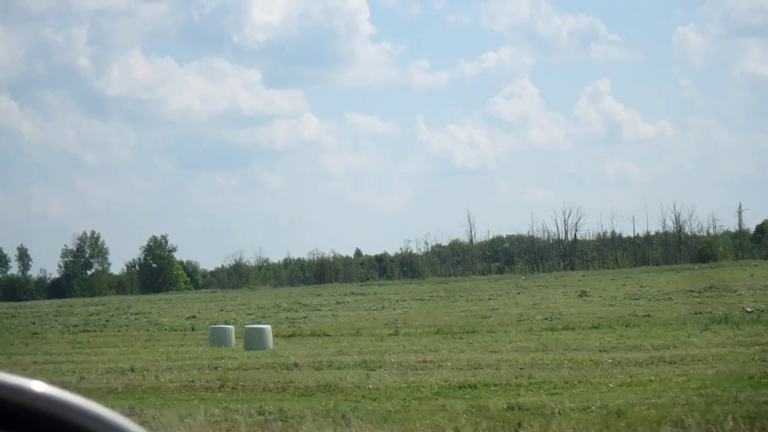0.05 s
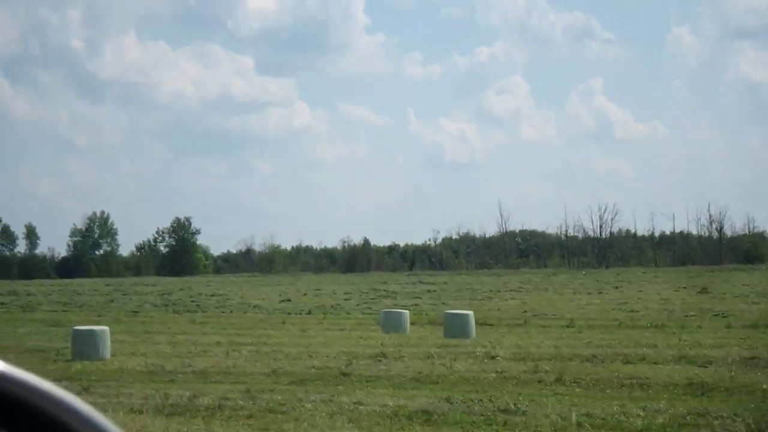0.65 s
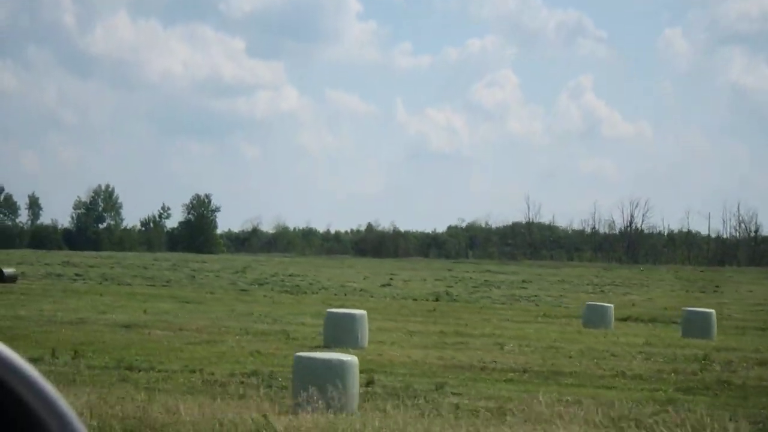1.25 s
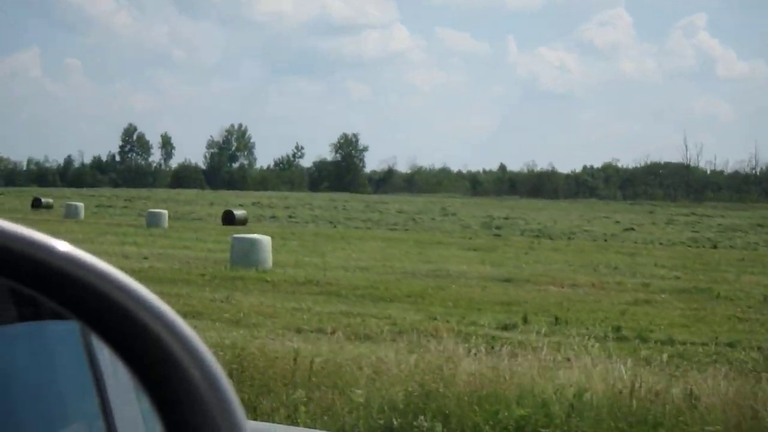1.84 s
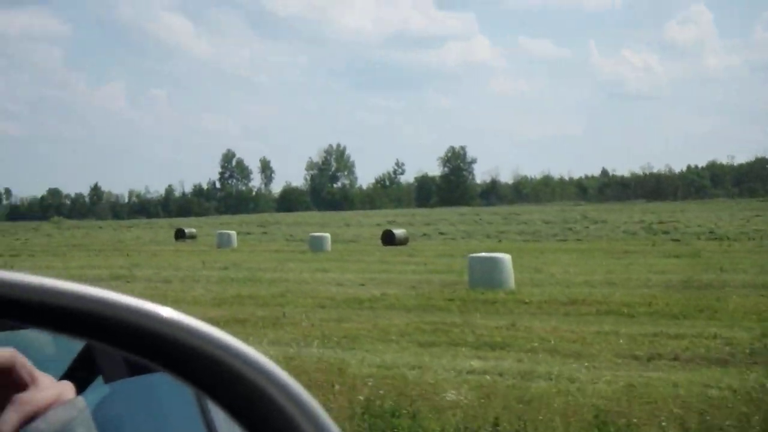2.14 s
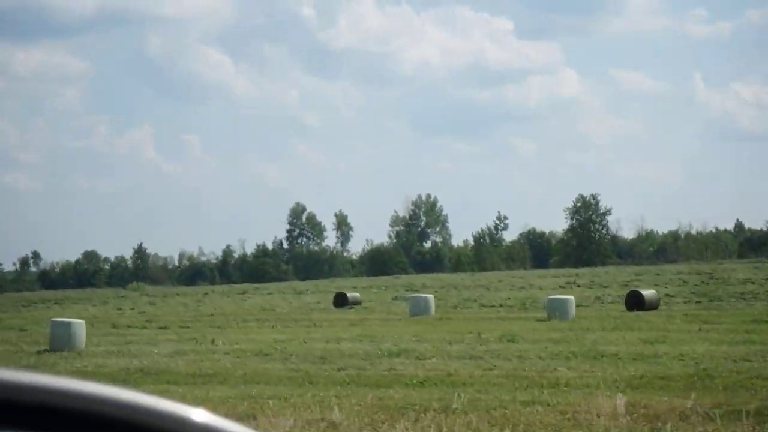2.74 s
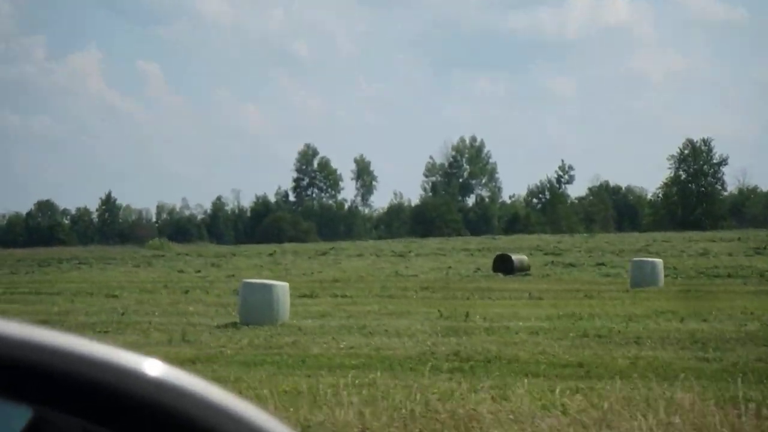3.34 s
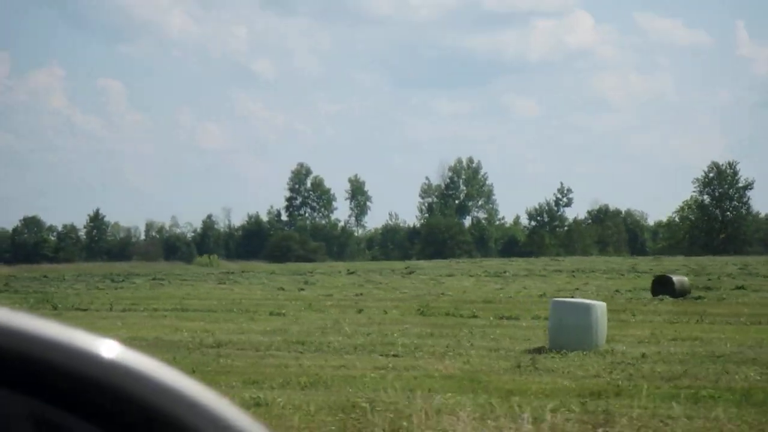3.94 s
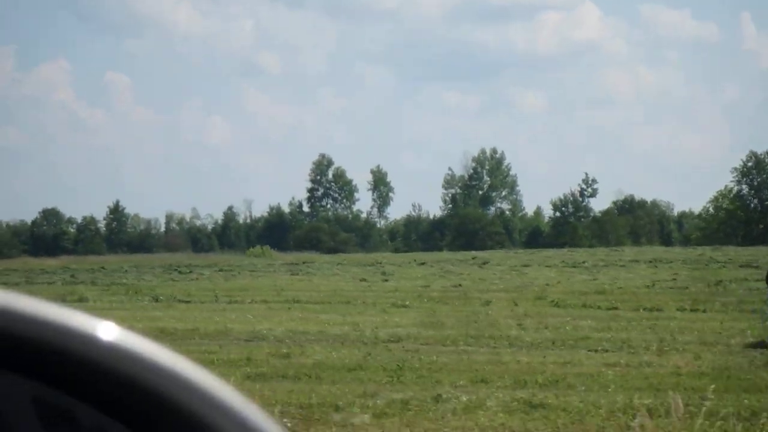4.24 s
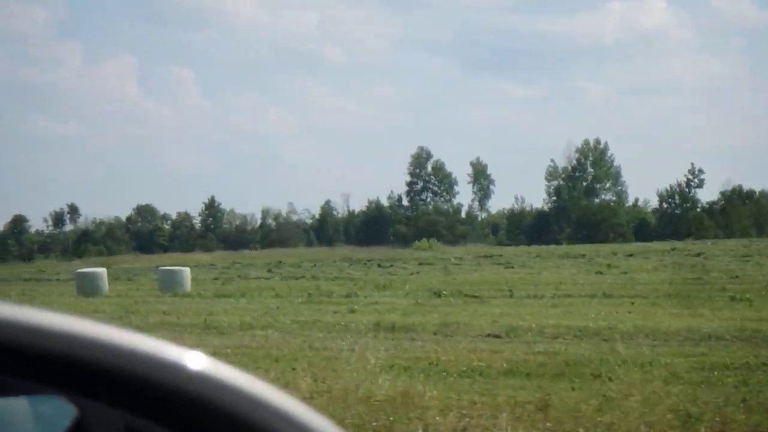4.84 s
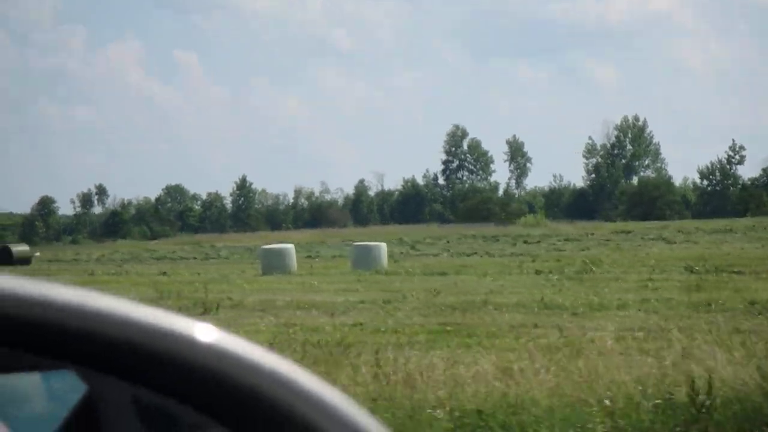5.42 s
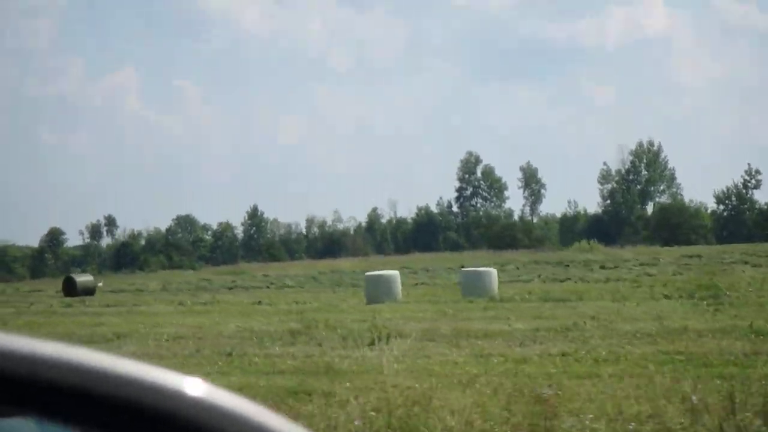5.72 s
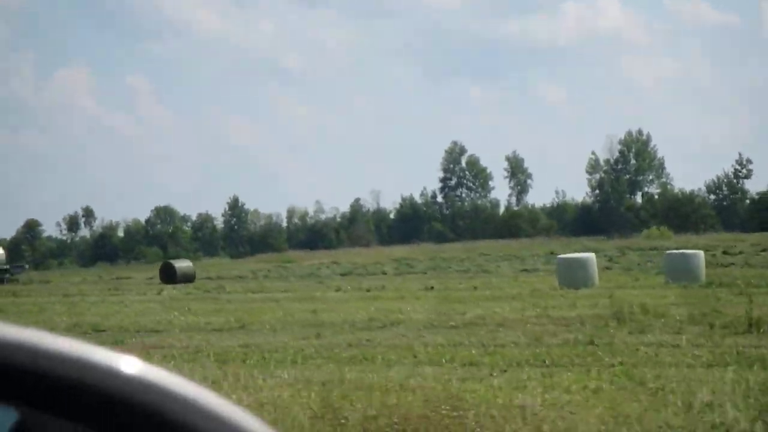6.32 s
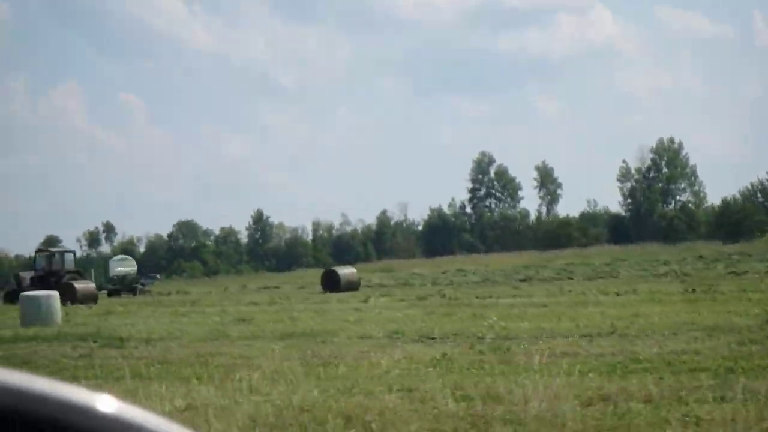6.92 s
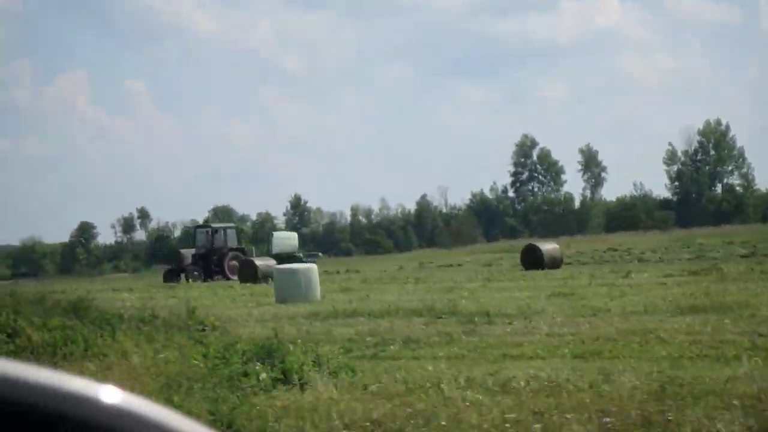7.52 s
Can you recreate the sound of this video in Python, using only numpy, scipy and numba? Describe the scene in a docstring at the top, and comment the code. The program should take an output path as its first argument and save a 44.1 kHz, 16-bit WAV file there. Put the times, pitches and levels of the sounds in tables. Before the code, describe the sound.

Dull thumps, a short scrape and a cluster of sharp plastic clicks sound right at a handheld microphone inside a moving car. The road noise ducks suddenly and takes some three seconds to recover. From then on, low rumble and slightly singing tyre roar fill the cabin, rising and falling gently with the asphalt. Beneath them are a faint engine hum, window hiss, tiny ticks and occasional soft draughts.

```python
"""Tyres roar and sing on a country road, heard inside the car: the cabin booms, the engine hums
faintly, wind hisses at the window seals. At the start a hand bumps, scrapes and clicks on the
pocket camera; its gain control ducks by about 30 dB and recovers over some three seconds.
Later, puffs of draught on the microphones and small ticks from the grip and the cabin trim."""
import sys
import numpy as np
from scipy import signal
from scipy.fft import irfft
from scipy.io import wavfile
from scipy.ndimage import uniform_filter1d
from numba import njit

SR = 44100
rng = np.random.default_rng(int(sys.argv[2]) if len(sys.argv) > 2 else 0)


def dump_mix(stems):
    """Bounce the given channels to the path in sys.argv[1] as a 16-bit WAV at rate SR."""
    frames = np.atleast_2d(stems).T  # one column per channel
    limited = np.clip(frames, -1, 1)  # hard clip at full scale
    pcm = np.round(limited * 32767).astype(np.int16)
    wavfile.write(sys.argv[1], SR, pcm)


N = 333837
TIME_S = np.arange(N) / SR
FREQS_HZ = np.maximum(np.fft.rfftfreq(N, 1 / SR), 1)

# noise spectra: freq_hz, relative_density_db
CABIN_AIR_SPECTRUM = [(14, -18), (21, -2), (31, -2), (42, 0.5), (52, -1.5), (62, -8), (72, -11.5),
                      (95, -17), (160, -42)]
BODY_PANEL_SPECTRUM = [(55, -26), (85, 6), (112, 2.5), (140, 1.3), (172, 3), (215, -3), (290, -0.85),
                       (370, -1.04), (460, -3), (570, 0.7), (690, -3.5), (850, -9), (1100, -33.5),
                       (2000, -54)]
TREAD_SPECTRUM = [(500, -8), (850, -4.5), (985, 2.15), (1070, -2.5), (1280, -3.5), (1380, -7), (1550, -6.5),
                  (1850, -10), (2300, -14.5), (2650, -16.5), (2950, -21.5), (3250, -14), (3700, -27.5),
                  (5000, -36)]
WINDOW_SEAL_SPECTRUM = [(2500, -53), (3900, 9.5), (4400, -11), (5000, 1.5), (5600, 6), (6400, -4.5),
                        (7200, 1), (7750, -3.5), (8300, -0.5), (8900, -4.5), (10500, -7.5), (11800, -20),
                        (14800, -21), (15800, -29)]
PALM_SPECTRUM = [(70, 14.5), (140, 5), (230, -1), (500, -8), (1500, -13.5), (3300, -17), (5000, -35)]
CASE_SPECTRUM = [(100, 10), (700, -10.5), (1800, 2), (2600, -13), (3400, 3), (3850, 5.5), (4600, -3),
                 (5600, 5), (7000, -4.5), (8200, 2.5), (10500, -5.5), (12500, -19), (15500, -17)]
CASE_SNAP_SPECTRUM = [(7000, -14), (10000, -2), (13000, 0), (15000, -8), (16000, -11)]
DRAUGHT_SPECTRUM = [(45, -2), (110, 2), (190, -6), (300, -13), (550, -28)]
TRIM_SPECTRUM = [(1000, -27), (4000, -11), (8000, -7.5), (11000, -15), (12500, -25), (15500, -30)]
# road bumps, coarser (+) or smoother (-) asphalt: centre_s, length_s, rise_db
ROAD_BUMPS = [(.5, 0.13, 7.5), (1.1, 0.63, 4), (1.48, 0.16, 5), (1.77, 0.17, 5.5), (2.3, .3, 1.5),
              (2.85, 0.23, 6), (3.98, 0.18, 5.5), (5.4, .25, 2), (5.93, 0.12, 6), (6.35, 0.42, 3),
              (6.85, 0.33, 2), (7.38, 0.47, 6.5)]
ASPHALT_STRETCHES = [(.08, 0.12, 3), (2.02, 0.4, 1.5), (2.75, 0.34, 1.4), (3.68, .36, 2), (4.44, 0.19, 1.6),
                     (4.8, .16, -0.5), (5.2, 0.35, 1.5), (5.78, 0.35, 2), (6.9, 0.68, 1.3)]
# engine harmonics: firing_multiple, level_db
ENGINE_ORDERS = [(1, -31.5), (2, -36), (3, -39.5)]
# finger strokes on the case: start_s, length_s, level_db
FINGER_STROKES = [(0.198, 0.065, -15.5), (.27, .08, -34), (0.349, 0.034, -16)]
# short bursts: start_s, level_db, decay_ms
PALM_THUMPS = [(.062, -10, 32), (.088, -14, 18), (.207, -9.5, 12), (.222, -6.5, 22), (.347, 6, 7.3)]
CASE_CLICKS = [(.2099, -12, 0.83), (.2392, 4.5, 2.5), (.2456, 0.5, 1.5), (.2566, -13, 2.5),
               (.2856, -8, 1.2), (.3116, -15, 3.1), (.3183, 0, 0.83), (.3468, 7, 4.6), (.3497, 10.5, 2.2),
               (.352, 9.5, 1.6), (.3556, 5, 2.7), (.3736, -6, 2), (.4948, -2.5, 1.2), (.5392, -6, 1.6),
               (6.0145, -11.5, 0.97)]
DRAUGHT_PUFFS = [(1.405, -22, 15), (3.255, -29, 28), (6.93, -29, 30), (7.33, -33, 49)]
TRIM_TICKS = [(1.63, -26, 1), (2.14, -35, 2), (3.07, -39, 3), (3.478, -30, 1.6), (3.9092, -33, 2.7),
              (4.6108, -39, 12), (4.6812, -24, 2.1), (5.1216, -39, 8), (5.8624, -35, 3), (6.872, -38, 2.1),
              (7.4542, -35, 2.6)]
# camera's filters: narrow notches against its own motor whine, then a broad dip from the microphone's colour:
# centre_hz, width_hz, gain_db
CAMERA_NOTCHES = [(2040, 130, -17), (3065, 150, -20), (4105, 120, -14), (5125, 120, -16), (6145, 120, -12),
                  (6550, 650, -10)]


def undb(db):
    """Decibels to gain."""
    return 10 ** (np.asarray(db) / 20)


def colour(spectrum):
    """Gain per frequency bin, falling steeply beyond both ends of the spectrum."""
    hz, db = np.transpose(spectrum)
    skirts = np.minimum(FREQS_HZ / hz[0], 1) * np.minimum(hz[-1] / FREQS_HZ, 1)
    return undb(np.interp(np.log(FREQS_HZ), np.log(hz), db)) * skirts ** 4


def noise(response, side_db, diffuse=False, unrelated_hz=11400):
    """Stereo noise, mid at rms 1; diffuse sound differs more between microphones towards the treble."""
    draw = rng.standard_normal((4, len(FREQS_HZ)))
    mid, side = (draw[:2] + 1j * draw[2:]) * response
    side_gain = np.hypot(undb(side_db), diffuse * np.minimum(FREQS_HZ / unrelated_hz, 1) ** 2)
    mid, side = irfft(mid, N), irfft(side * side_gain, N)
    return (mid + side * np.array([[1], [-1]])) / np.std(mid)


def wander(rate_hz):
    """Random steps, smoothed twice; rms 1."""
    hold = int(SR / rate_hz)
    steps = np.repeat(rng.standard_normal(N // hold + 1), hold)
    smooth = uniform_filter1d(uniform_filter1d(steps, hold), hold)[:N]
    return smooth / np.sqrt(np.mean(smooth ** 2))


def balance(right_db):
    """Stereo gains, right louder than left by right_db."""
    return undb(np.array([[-right_db], [right_db]]) / 2)


def swells_db(features):
    """Level change as the wheels run onto each road feature and off again."""
    return sum(rise_db * 0.5 ** ((2 * (TIME_S - centre_s) / length_s) ** 2)
               for centre_s, length_s, rise_db in features)


def bursts(events, rise_ms):
    """Envelope of decaying contacts, summed in power; softer ones rise slower."""
    power = np.zeros(N)
    age_ms = 1000 * np.arange(SR // 4) / SR
    attack = 1 - np.exp(-age_ms / rise_ms)
    for start_s, level_db, decay_ms in events:
        start = int(start_s * SR)
        burst = undb(level_db) * attack * np.exp(-age_ms / decay_ms)
        power[start:start + len(burst)] += burst[:N - start] ** 2
    return np.sqrt(power)


def cabin_boom(road_db, level_db=-15.5):
    """Bumps and constant road unevenness pump the cabin air."""
    air = noise(colour(CABIN_AIR_SPECTRUM), side_db=-17.5)
    return air * undb(level_db + road_db + swells_db(ROAD_BUMPS) + 0.72 * wander(14))


def engine_hum(firing_hz=60.66):
    """Harmonics of the firing rate, wavering slightly at cruising speed."""
    phase = 2 * np.pi * np.cumsum(firing_hz * (1 + 0.0122 * wander(3))) / SR
    return sum(undb(level_db + 2.5 * wander(6)) * np.sqrt(2) * np.sin(multiple * phase)
               for multiple, level_db in ENGINE_ORDERS)


def air_ring(pitch_hz, width_hz, level_db):
    """Air resonance kept ringing by the road's grain."""
    stage_width_hz = 1.49 * width_hz  # two stages in series narrow the peak again
    detuning = (FREQS_HZ / pitch_hz - pitch_hz / FREQS_HZ) * pitch_hz / stage_width_hz
    return undb(level_db) * noise(1 / (1 + 1j * detuning) ** 2, side_db=-24.5)


def tyres(road_db, rumble_db=-20.5, tread_db=-23.5):
    """Panel rumble, tread roar and air ringing in tyre and grooves; all swell on coarse asphalt."""
    patches = wander(24)
    rumble = noise(colour(BODY_PANEL_SPECTRUM), side_db=-29.5) * undb(rumble_db + 0.34 * patches)
    tread = noise(colour(TREAD_SPECTRUM), side_db=-21.5, diffuse=True) * undb(tread_db + 0.74 * patches)
    cavity = air_ring(pitch_hz=247, width_hz=18.6, level_db=-35)
    grooves = air_ring(pitch_hz=1194, width_hz=84, level_db=-28.6) * undb(2 * wander(12))
    return (rumble + tread + cavity + grooves) * undb(road_db)


def wind(road_db, level_db=-44):
    """Air hisses along the window seals, rising and falling with the road roar."""
    hiss = noise(colour(WINDOW_SEAL_SPECTRUM), side_db=-11.5, diffuse=True)
    return hiss * undb(level_db + road_db + 0.3 * wander(3.17)) * balance(right_db=1.5)


def palm_thumps():
    """The palm bumps the camera dully."""
    return noise(colour(PALM_SPECTRUM), side_db=-21) * bursts(PALM_THUMPS, rise_ms=0.93)


def finger_slips(attack_s=0.032, release_s=0.004):
    """Envelope of a finger that presses in, sticks and slips, then lifts quickly."""
    pressure = np.zeros(N)
    for start_s, length_s, level_db in FINGER_STROKES:
        press = np.clip((TIME_S - start_s) / attack_s, 0, 1)
        lift = np.exp(-np.maximum(TIME_S - start_s - length_s, 0) / release_s)
        pressure += undb(level_db) * press * lift
    return pressure * undb(3.9 * wander(600))


def camera_case(slips, snap_db=-10.5, snap_db_per_db=1.66):
    """The plastic case scrapes under the finger and clicks; harder clicks snap brighter."""
    clicks = bursts(CASE_CLICKS, rise_ms=0.11)
    plastic = noise(colour(CASE_SPECTRUM), side_db=-2.5) * np.hypot(slips, clicks)
    snap = noise(colour(CASE_SNAP_SPECTRUM), side_db=-4.5) * undb(snap_db) * clicks ** snap_db_per_db
    return plastic + snap


def draught():
    """Puffs of air buffet each microphone differently."""
    return noise(colour(DRAUGHT_SPECTRUM), side_db=2) * bursts(DRAUGHT_PUFFS, rise_ms=2.5)


def trim_ticks(faint_count=40):
    """Loose trim ticks: a few clear ones among many at the edge of the hiss."""
    faint = [(when * (N - 1) / SR, -50 + 7 * size, 2) for when, size in rng.random((faint_count, 2))]
    return noise(colour(TRIM_SPECTRUM), side_db=-4) * bursts(list(TRIM_TICKS) + faint, rise_ms=0.11)


@njit
def gain_cut_db(excess_db, attack_s, release_s, creep_db_per_s):
    """Gain reduction: rises fast towards the excess, falls back ever slower."""
    cuts_db, cut_db = np.empty(len(excess_db)), 0.
    for i in range(len(excess_db)):
        if excess_db[i] > cut_db:
            cut_db += (excess_db[i] - cut_db) / (attack_s * SR)
        else:
            cut_db = max(cut_db - (cut_db / release_s + creep_db_per_s) / SR, 0.)
        cuts_db[i] = cut_db
    return cuts_db


def gain_control(x, treble_hz=3000, threshold_db=-27):
    """Driven by the treble, so case clicks duck the whole cabin."""
    treble = signal.sosfilt(signal.butter(4, treble_hz, "high", fs=SR, output="sos"), x)
    power = uniform_filter1d(np.mean(treble ** 2, axis=0), size=220)
    excess_db = 10 * np.log10(np.abs(power) + 1e-12) - threshold_db
    return x * undb(-gain_cut_db(excess_db, attack_s=0.007, release_s=3.03, creep_db_per_s=5.))


def scene(easing_db_per_s=0.3545):
    """Sound at both microphones; boom, tyres and wind follow the asphalt and sink as the car slows."""
    road_db = swells_db(ASPHALT_STRETCHES) - easing_db_per_s * TIME_S
    cabin = (cabin_boom(road_db) + engine_hum()) * balance(right_db=1.1)
    ride = cabin + tyres(road_db) + wind(road_db)
    return ride + draught() + camera_case(finger_slips()) + palm_thumps() + trim_ticks()


def record(dry):
    """Camera chain: notches, unmute, gain control, soft clip, low-pass."""
    unmute_s, fade_s, ceiling, lowpass_hz = 0.052, 0.016, 2.1, 15900
    x = dry
    for centre_hz, width_hz, gain_db in CAMERA_NOTCHES:
        band = signal.lfilter(*signal.iirpeak(centre_hz, centre_hz / width_hz, fs=SR), x)
        x = x - (1 - undb(gain_db)) * band
    x = x * np.clip((TIME_S - unmute_s) / fade_s, 0, 1)
    x = gain_control(x)
    x = ceiling * np.tanh(x / ceiling)
    return signal.sosfilt(signal.ellip(8, 0.2, 70, lowpass_hz, fs=SR, output="sos"), x)


dry = scene()
out = record(dry)
dump_mix(out)
```